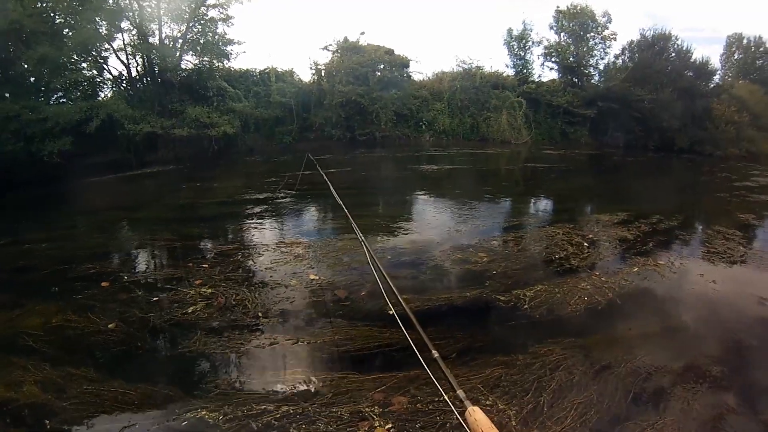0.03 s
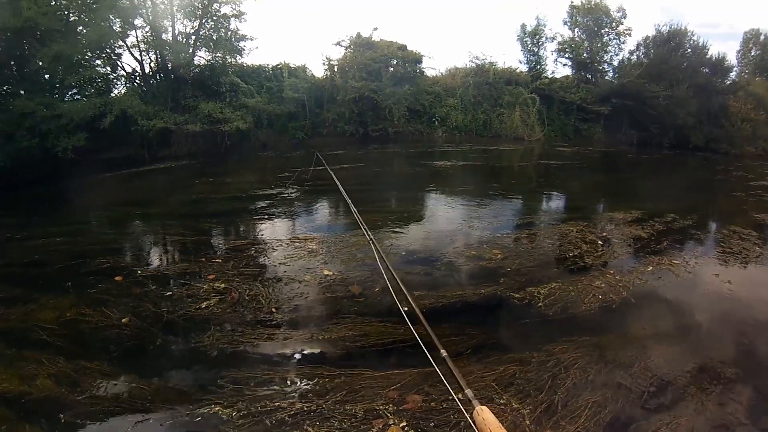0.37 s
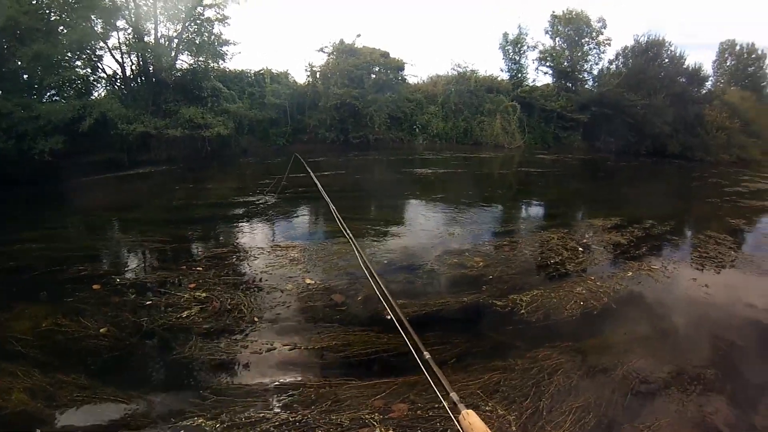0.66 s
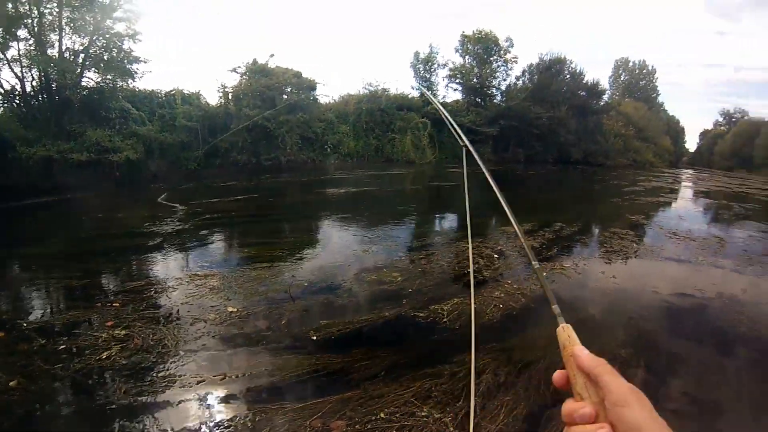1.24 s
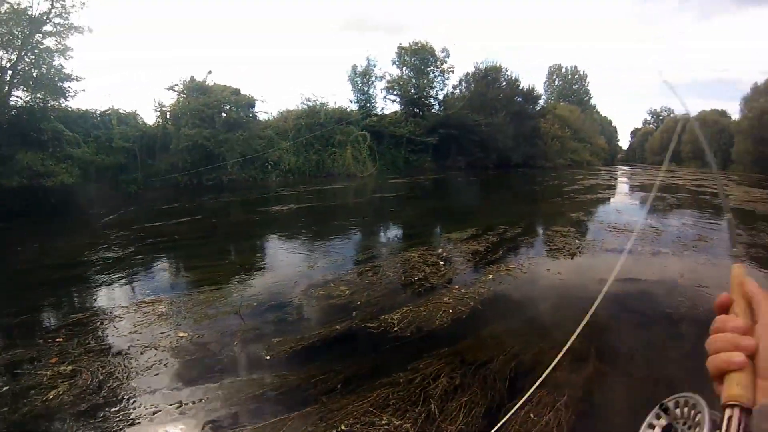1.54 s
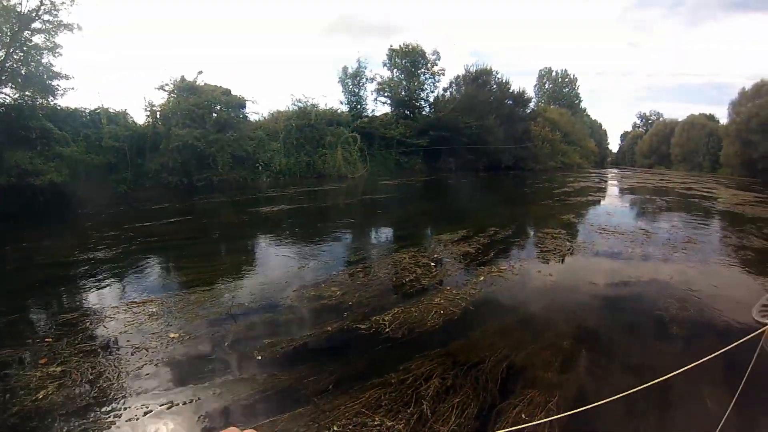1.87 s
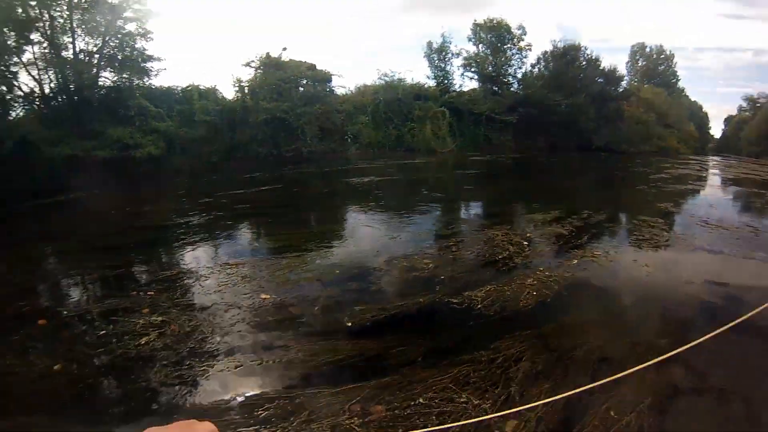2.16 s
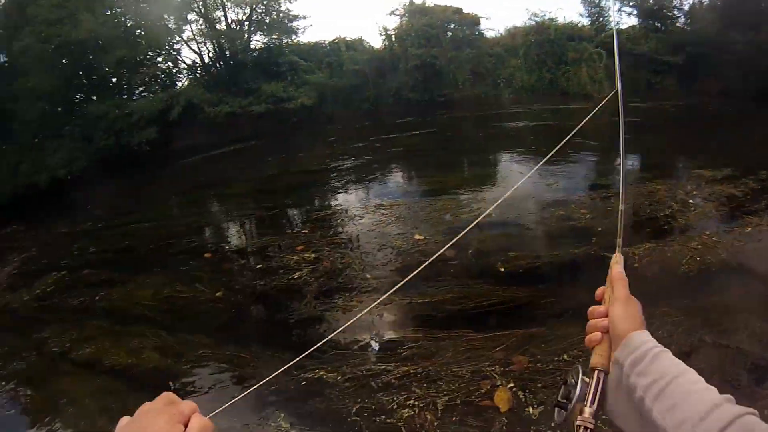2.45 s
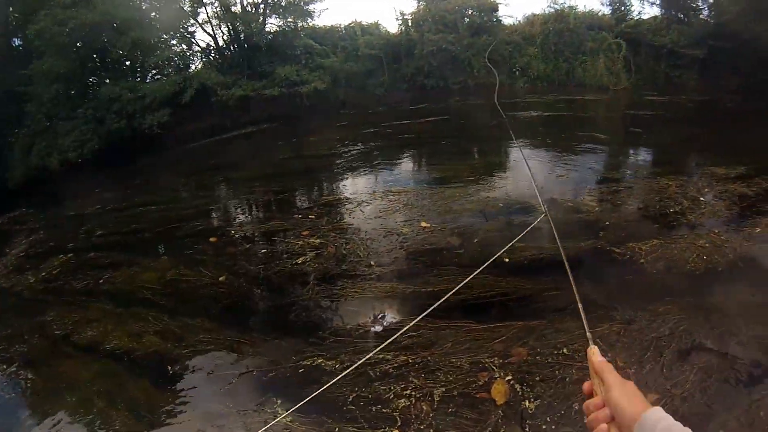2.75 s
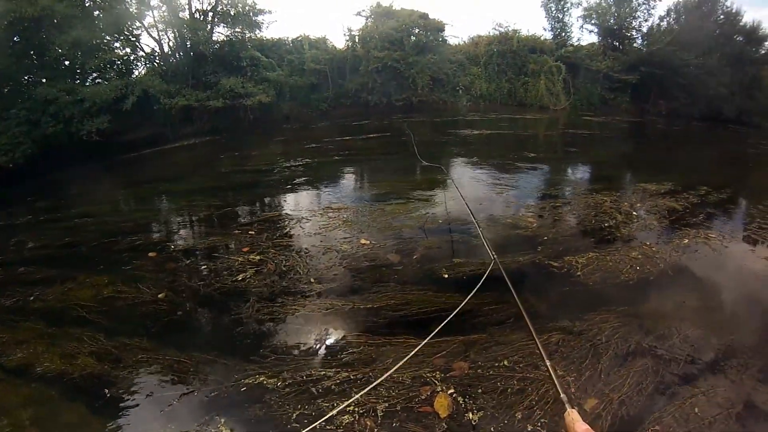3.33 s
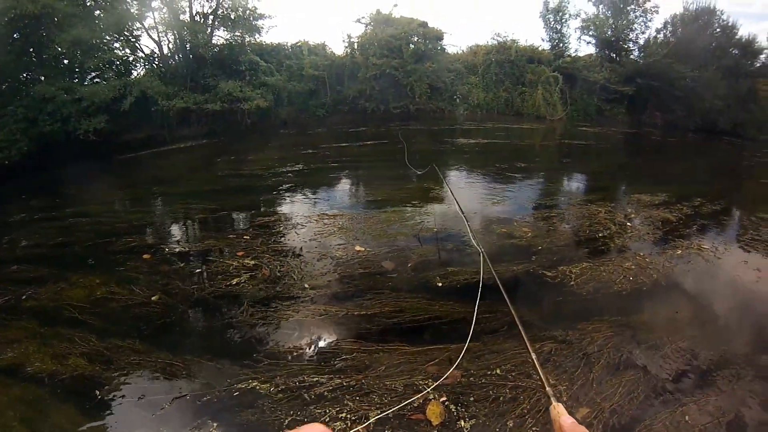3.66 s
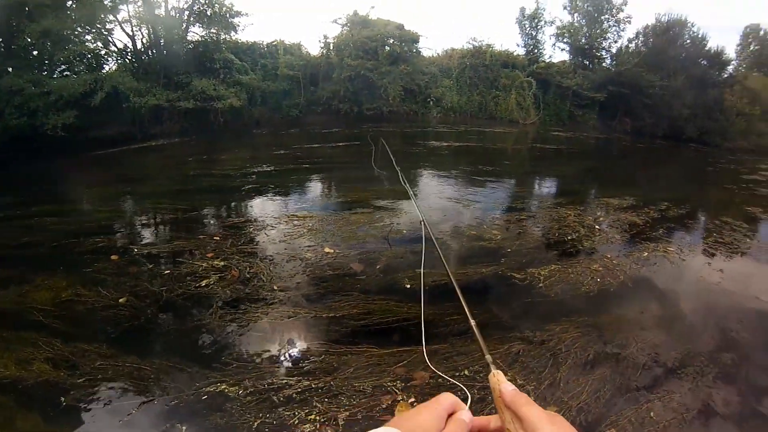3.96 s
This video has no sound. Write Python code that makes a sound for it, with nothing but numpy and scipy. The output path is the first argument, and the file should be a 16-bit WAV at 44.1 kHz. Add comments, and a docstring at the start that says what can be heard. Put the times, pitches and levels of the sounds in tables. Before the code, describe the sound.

A fly rod makes one cast: the line sizzles faintly as it is lifted back, then the rod swishes forward. Tackle knocks and a sleeve rustles close to the microphone, over a steady river wash and low wind rumble.

```python
"""A steady wash of river and a low rumble of wind, heard on the bank from a camera worn by an angler.
One cast of a fly rod follows, at arm's length: the line sizzles through the rings as it is lifted back,
then the rod swishes forward, shedding eddies. Something plops in the water, and close to the microphone
tackle knocks and a sleeve rustles as the hand gathers line."""
import sys
import numpy as np
from scipy import signal
from scipy.fft import rfft, irfft
from scipy.io import wavfile

SR = 44100
rng = np.random.default_rng(int(sys.argv[2]) if len(sys.argv) > 2 else 0)


def materialize(psi):
    """Save the field psi as 16-bit PCM at rate SR to the path in sys.argv[1].

    A 1-D psi becomes a single channel; in a 2-D psi each row is a channel.
    """
    bounded = np.clip(np.atleast_2d(psi).T, -1, 1)
    quanta = np.round(bounded * 32767).astype(np.int16)
    wavfile.write(sys.argv[1], SR, quanta)


N = 176400


def undb(db):
    """Decibels to gain."""
    return 10 ** (np.asarray(db) / 20)


def unit(x):
    """Scale to rms 1."""
    return x / np.sqrt(np.mean(np.abs(x) ** 2))


def clock():
    """Time of each sample in seconds."""
    return np.arange(N) / SR


def colour(x, points):
    """Filter x by (f/Hz, level/dB) points, falling away beyond their ends; rms 1."""
    hz, db = np.array(points, float).T
    f = np.maximum(np.fft.rfftfreq(N, 1 / SR), 1)
    ends = np.minimum(f / hz[0], 1) ** 2 * np.minimum(hz[-1] / f, 1) ** 2
    gain = undb(np.interp(np.log(f), np.log(hz), db))
    return unit(irfft(rfft(x) * ends * gain, N))


def wander(width_hz):
    """Complex random drift with the given bandwidth; rms 1."""
    f = np.abs(np.fft.fftfreq(N, 1 / SR)) / width_hz
    noise = rng.standard_normal(N) + 1j * rng.standard_normal(N)
    return unit(np.fft.ifft(noise / (1 + f * (2 * f) ** 2)))


def whistle(hz, width_hz):
    """An airy band of noise around a pitch that may move; rms 1."""
    phase = 2 * np.pi * np.cumsum(hz * np.ones(N)) / SR
    return unit((wander(width_hz) * np.exp(1j * phase)).real)


def swell(at, rise, fall):
    """A bell-shaped movement that peaks at 1; times in seconds."""
    t = clock() - at
    return np.exp(-.5 * (t / np.where(t < 0, rise, fall)) ** 2)


def strike(at, decay, attack=0.0017):
    """A quick attack and an exponential decay; times in seconds."""
    t = clock() - at
    return np.clip(1 + t / attack, 0, 1) * np.exp(-np.maximum(t, 0) / decay)


def ring(at, hz, decay, glide=0):
    """A damped swing; its pitch rises by the share `glide` per second."""
    t = np.maximum(clock() - at, 0)
    return np.exp(-t / decay) * np.sin(2 * np.pi * hz * t * (1 + glide * t / 2))


def friction(clicks_per_s=3500, spread_db=2.5):
    """Dense tiny clicks of rubbing cloth or line, a few much larger than the rest."""
    clicks = (rng.random(N) < clicks_per_s / SR) * rng.choice([-1, 1], N)
    return clicks * undb(spread_db * np.minimum(rng.exponential(size=N), 5))


def chatter(width_hz=160, depth_db=2):
    """Uneven gain of line catching and slipping in the rings; rms 1."""
    return unit(undb(depth_db * wander(width_hz).real))


# Spectrum of a faint, wide, high hiss: f/Hz, relative level/dB
HISS = [(170, -20), (330, -13), (700, -17), (1000, -26), (1400, -2.5), (4500, 5.5), (8000, 6.5), (11500, 4),
        (15000, 1)]

def wide_hiss(level_db=-78):
    """Faint, wide hiss, opposite in sign in the two channels."""
    return undb(level_db) * colour(rng.standard_normal(N), HISS) * np.array([[1], [-1]])


# Spectrum of the water from the bank: f/Hz, relative level/dB
RIVER = [(53, -31), (90, -2.5), (141, -4.5), (157, -5), (190, -7), (241, -8), (362, -10.5), (458, -13.5),
         (510, -13), (703, -11), (749, -10.5), (816, -9.5), (870, -11.5), (1010, -13.5), (1130, -21.5),
         (1650, -28.5), (2710, -27), (4620, -34), (15000, -41.5)]

def river(level_db=-54, flicker_db=1.18):
    """Running water makes a steady wash that flickers gently."""
    wash = colour(rng.standard_normal(N), RIVER)
    return wash * undb(level_db + flicker_db * wander(width_hz=23).real)


# Spectrum of the wind at the microphone: f/Hz, relative level/dB
RUMBLE = [(12, -8), (24, -7), (34, -6), (44, 2.5), (62, -3.5), (72, -7.5), (100, -14), (170, -23.5)]
# Its rise and fall: t/s, relative level/dB
GUSTS = [(0, 1.5), (.35, 1), (1.1, 0.5), (1.55, -3.5), (2.05, -0.5), (2.62, 1.5), (3.198, -1), (3.55, -0.5),
         (4, 1)]

def wind():
    """Wind rumbles low, with a wavering drone in it."""
    drone = undb(-56) * whistle(hz=57.15, width_hz=6.6)
    rumble = undb(-50.5) * colour(rng.standard_normal(N), RUMBLE)
    gust = undb(np.interp(clock(), *np.array(GUSTS).T))
    return gust * (rumble + drone)


# Bubbles out in the river: t/s, level/dB, f/Hz, decay/s
BUBBLES = [(3.331, -41, 480, .0045), (3, -46, 690, 0.0044), (3.330, -52.5, 2370, .002)]

def plop():
    """Bubbles ring and rise in pitch as they near the surface."""
    return sum(undb(db) * ring(at, hz, decay, glide=4.5) for at, db, hz, decay in BUBBLES)


# Clothing and tackle bumping close to the microphone: t/s, level/dB, f/Hz, decay/s
KNOCKS = [(1.29, -40, 290, 0.0053), (2.198, -40, 825, 0.0017), (2.273, -45, 800, .004),
          (2.323, -39, 404, 0.0019), (2.452, -37, 300, 0.0009), (2.497, -31, 426, 0.0011),
          (2.545, -34.5, 410, 0.0032), (3.844, -32.5, 520, 0.0012), (3.869, -41, 520, 0.0025)]
# Resonances of the camera housing and chest mount: f/Hz, level/dB relative to the knock, decay/s
HOUSING_MODES = [(374, -26, 0.011), (706, -16, 0.01), (1090, -19, .006)]

def knocks():
    """Each dull bump is a few quickly damped swings; the camera housing rings on briefly."""
    bumps = np.zeros(N)
    for at, db, hz, decay in KNOCKS:
        housing = sum(undb(level) * ring(at, f, fade) for f, level, fade in HOUSING_MODES)
        bumps += undb(db) * (ring(at, hz, decay) + housing)
    return bumps


# Spectra of the sleeve's rustle and its low flapping: f/Hz, relative level/dB
RUSTLE = [(600, 11), (1400, -1.5), (1950, -1.5), (2750, -6.5), (3200, 3.5), (3900, -8), (5300, -7.5),
          (6800, -13.5), (10000, -19.5), (15000, -29)]
FLAP = [(80, 0.5), (200, -4), (380, -1.5), (650, -5), (1000, -2.5), (1350, -28.5), (2500, -24)]
# Arm movements beside the camera: t/s, rise/s, fall/s, rustle level/dB, flap level/dB
ARM_MOVES = [(1.47, 0.17, 0.077, -63, -64), (2.36, 0.45, 0.25, -64.5, -61.5),
             (2.49, 0.03, 0.051, -67, -49.5), (2.85, 0.5, 0.52, -68.5, -60.5),
             (3.86, 0.12, 0.031, -62.5, -59), (3.961, 0.073, 0.13, -53, -50)]

def sleeve():
    """Cloth rubs and flaps with each movement of the arm."""
    rustle, flap = colour(friction(), RUSTLE), colour(friction(), FLAP)
    return sum(swell(at, rise, fall) * (undb(rustle_db) * rustle + undb(flap_db) * flap)
               for at, rise, fall, rustle_db, flap_db in ARM_MOVES)


# Spurts of line at arm's length: t/s, half length/s, f/Hz, level/dB
SLIPS = [(.44, .04, 4650, -71.5), (1.74, 0.029, 3120, -69), (2.043, 0.037, 3070, -72),
         (2.468, 0.016, 8200, -70.5), (2.528, 0.013, 3150, -63), (2.638, 0.024, 4140, -68),
         (2.87, 0.067, 5150, -74), (3.052, 0.063, 5740, -72), (3.946, .012, 5000, -67),
         (3.948, 0.01, 3000, -56)]

def line_slips(width_share=0.36):
    """The line slips in short spurts, each a band of hiss."""
    return sum(undb(db) * swell(at, half, half) * whistle(hz, hz * width_share)
               for at, half, hz, db in SLIPS)


# Taps along the rod: t/s, level/dB, f/Hz
TICKS = [(1.451, -52.5, 3800), (2.322, -53, 1640), (2.467, -62, 4300), (3.233, -61, 3000),
         (3.751, -61, 5000), (3.777, -57.5, 5200)]

def line_ticks(width_share=0.81):
    """The line strikes the rod in tiny bursts of noise."""
    return sum(undb(db) * strike(at, decay=0.0018) * whistle(hz, hz * width_share)
               for at, db, hz in TICKS)


# Resonances of line gathered close to the camera: f/Hz, width/Hz, level/dB
DRAW_BANDS = [(1985, 220, -66.5), (2485, 170, -69), (3186, 260, -64), (5280, 700, -76)]

def line_draw(at=3.925, sag_per_s=1.26):
    """Line drawn in rasps over the rings; the pitch sags as the hand slows."""
    sag = 1 - sag_per_s * np.maximum(clock() - at, 0)
    pull = swell(at, rise=.085, fall=.09) * chatter()
    return pull * sum(undb(db) * whistle(hz * sag, width) for hz, width, db in DRAW_BANDS)


# Line running out in front of the microphone on the back cast: t/s, level/dB
LINE_RUN = [(1.0, -86), (1.05, -70), (1.13, -76), (1.22, -76), (1.29, -69), (1.44, -67.5), (1.54, -64.5),
            (1.67, -67.5), (1.77, -72.5), (1.82, -74), (1.87, -86)]
# Its sizzle: f/Hz, width/Hz, level/dB relative to the run, entry t/s
SIZZLE = [(5250, 360, -3.5, .9), (4780, 340, -3.5, 1.48), (5040, 760, -16, 1)]
# Spectrum of its coating's broad rasp: f/Hz, relative level/dB
RASP = [(1300, -4), (1900, 1.5), (3400, -2), (5200, -6), (9000, -14)]

def back_cast(low_peak_s=1.64, sag_hz_per_s=1500):
    """The running line sizzles and rasps in the rings; a lower band sags as it slows."""
    t = clock()
    run = undb(np.interp(t, *np.array(LINE_RUN).T, left=-np.inf, right=-np.inf))
    sizzle = sum(undb(db) * np.clip((t - start) / 0.021, 0, 1) * whistle(hz, width)
                 for hz, width, db, start in SIZZLE)
    low_band = whistle(hz=3300 - sag_hz_per_s * (t - low_peak_s), width_hz=260)
    low_band *= undb(-69.5) * swell(low_peak_s, rise=0.12, fall=0.12)
    rasp = undb(-2.5) * colour(friction(), RASP)
    return chatter() * (run * (sizzle + rasp) + low_band)


def back_swing(level_db=-63.5):
    """The rod whispers through the air on its slower swing back."""
    return undb(level_db) * swell(at=1.3, rise=0.16, fall=0.16) * whistle(hz=930, width_hz=220)


# Rod sections passing the microphone at top speed, butt to tip: f/Hz, width/Hz, level/dB
ROD_SECTIONS = [(214.4, 150, -60), (420, 300, -53.5), (777, 170, -54.5), (1053, 340, -57),
                (2000, 1100, -63)]

def forward_stroke(slowest=0.78):
    """Each section of the rod sheds eddies, whistling higher and louder as the stroke speeds up."""
    effort = swell(at=2.497, rise=0.045, fall=0.0265)
    speed = slowest + (1 - slowest) * effort  # share of top speed
    return effort * sum(undb(db) * whistle(hz * speed, width) for hz, width, db in ROD_SECTIONS)


def scene():
    """The angler's sounds sit in the centre, over river, wind and wide hiss."""
    background = river() + wide_hiss() + wind()
    cast = back_cast() + back_swing() + forward_stroke()
    handling = line_slips() + line_ticks() + line_draw() + sleeve() + knocks()
    return background + cast + handling + plop()


def record(dry):
    """The body-worn camera cuts the treble steeply above 15250 Hz."""
    return signal.sosfilt(signal.ellip(10, .2, 70, 15250, fs=SR, output="sos"), dry)


dry = scene()
out = record(dry)
materialize(out)
```